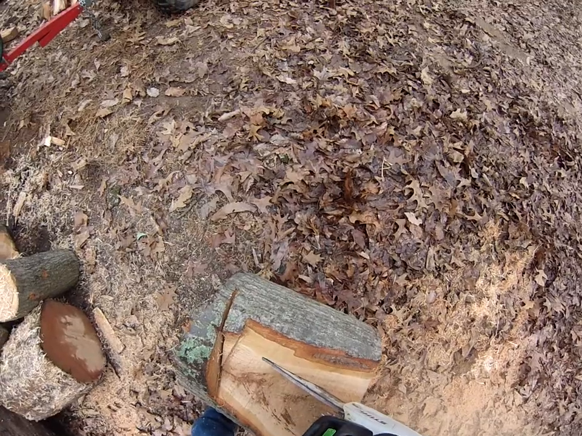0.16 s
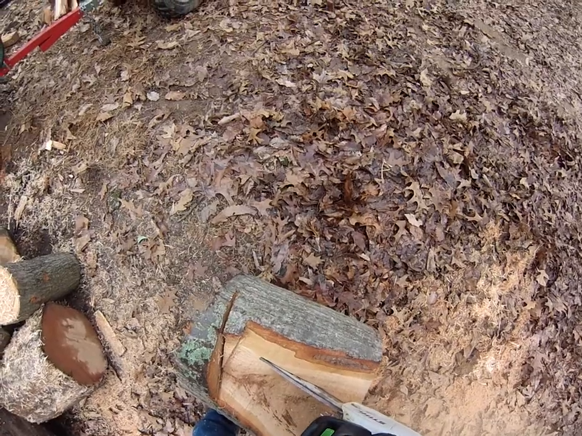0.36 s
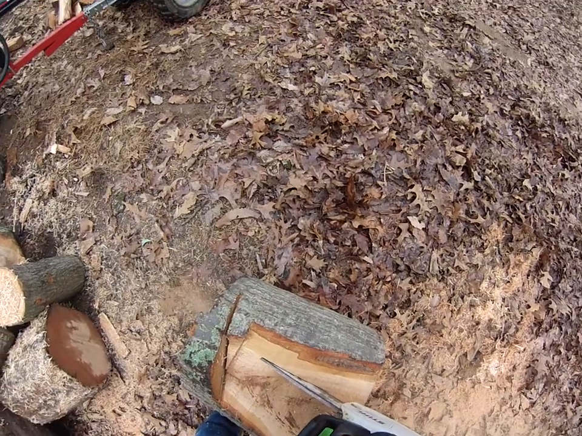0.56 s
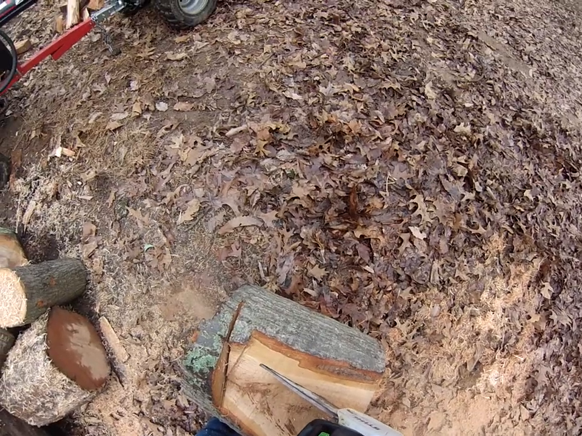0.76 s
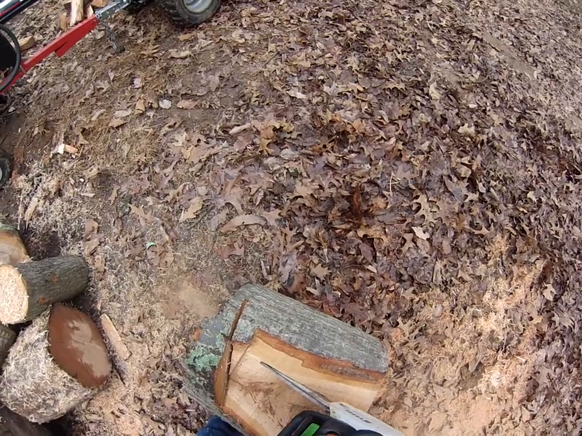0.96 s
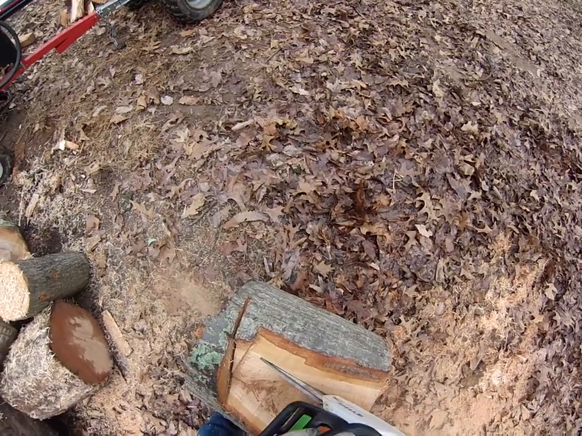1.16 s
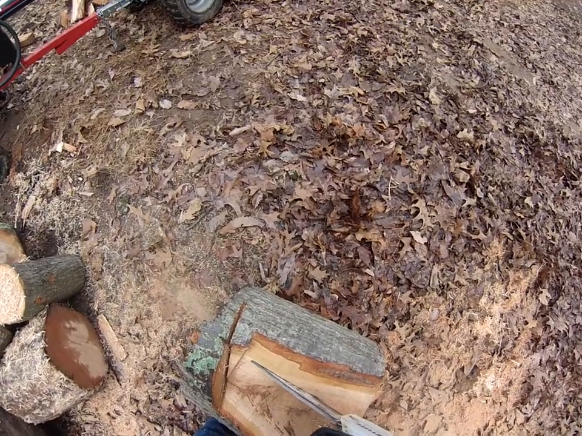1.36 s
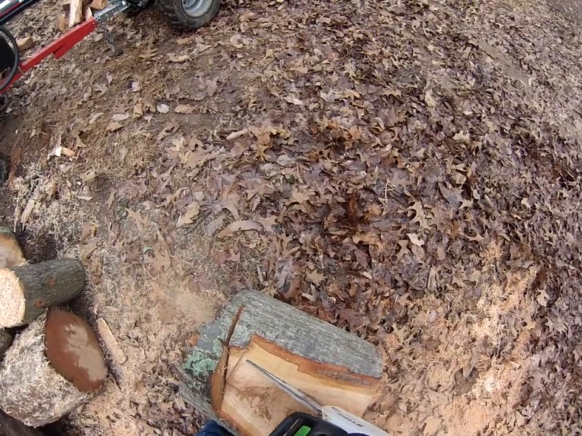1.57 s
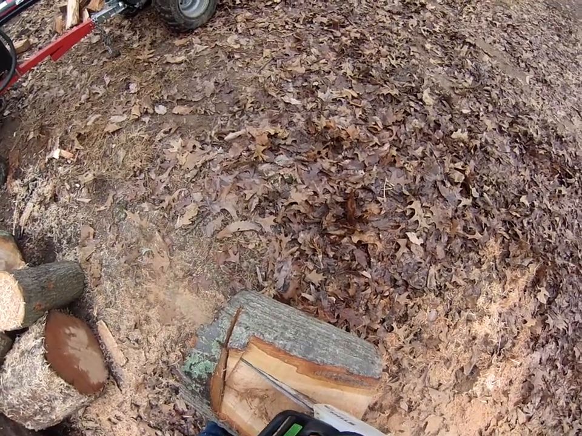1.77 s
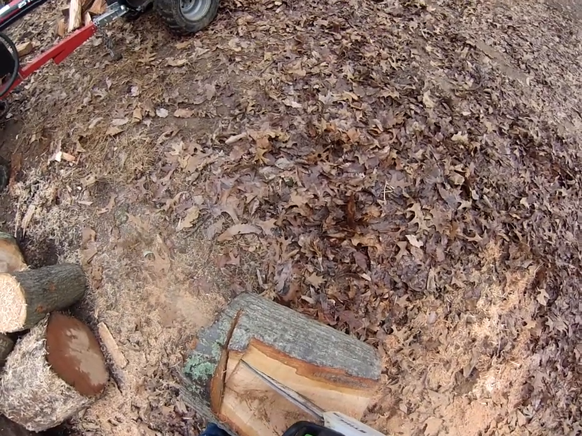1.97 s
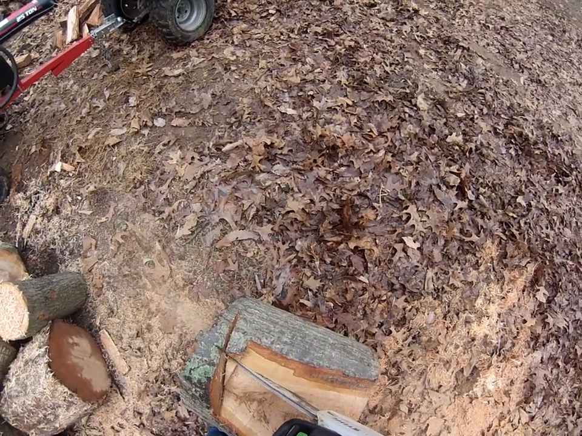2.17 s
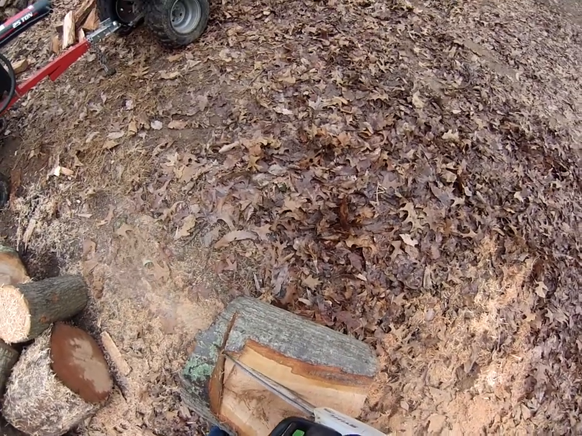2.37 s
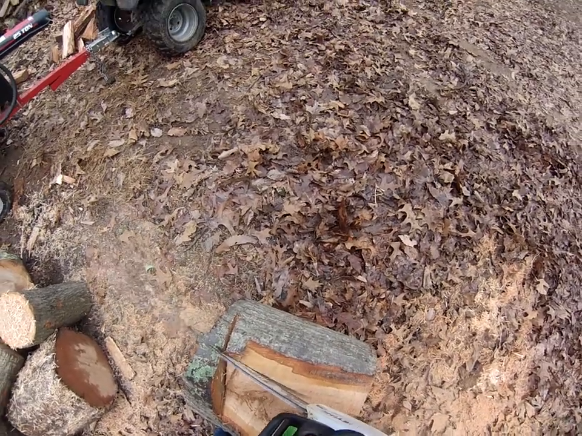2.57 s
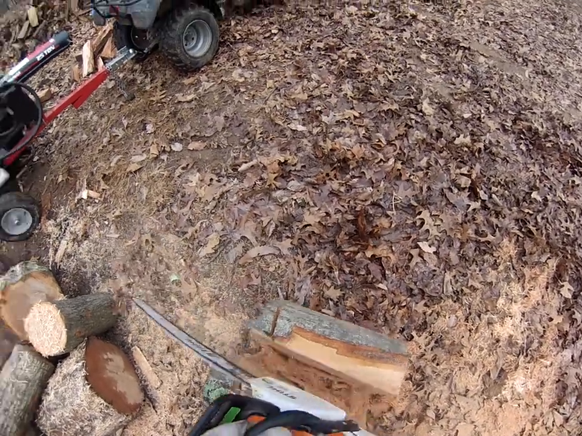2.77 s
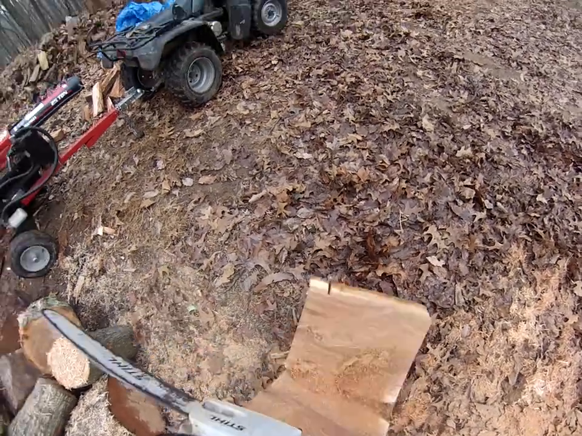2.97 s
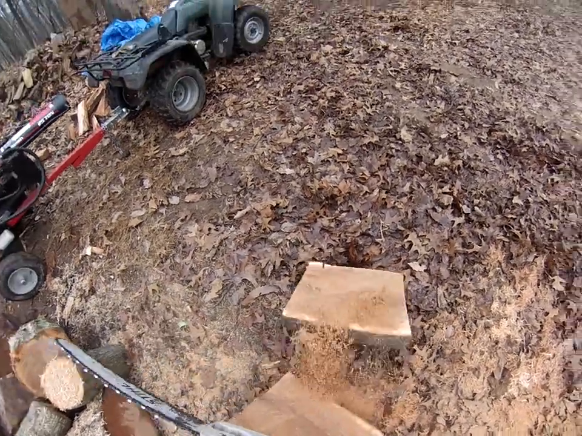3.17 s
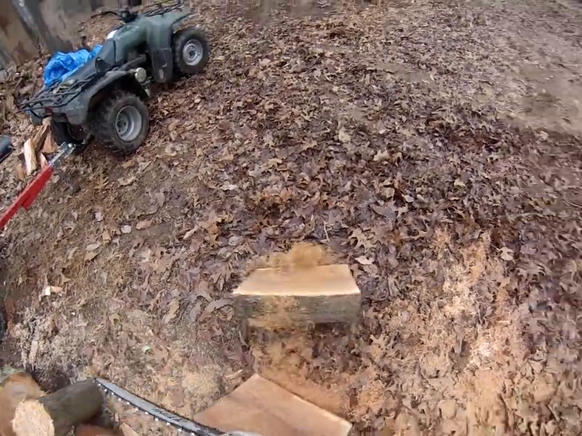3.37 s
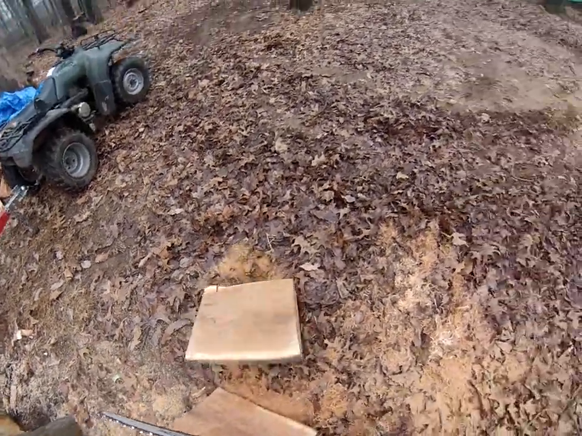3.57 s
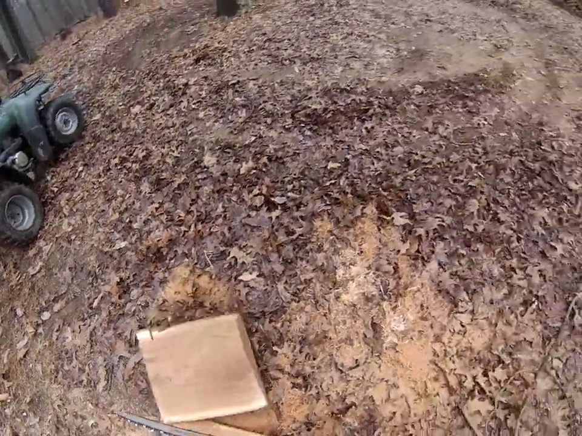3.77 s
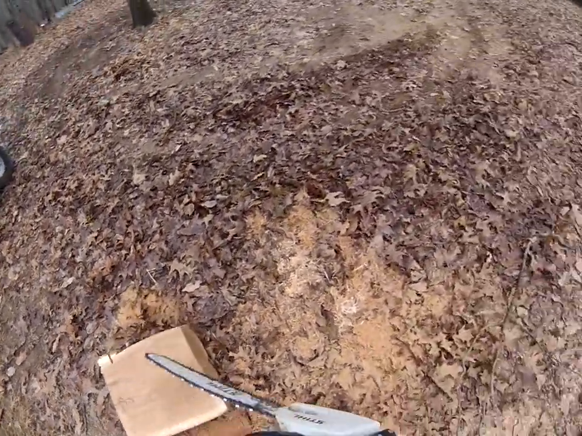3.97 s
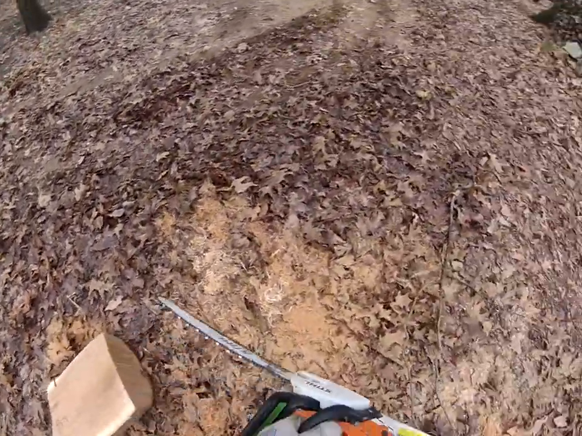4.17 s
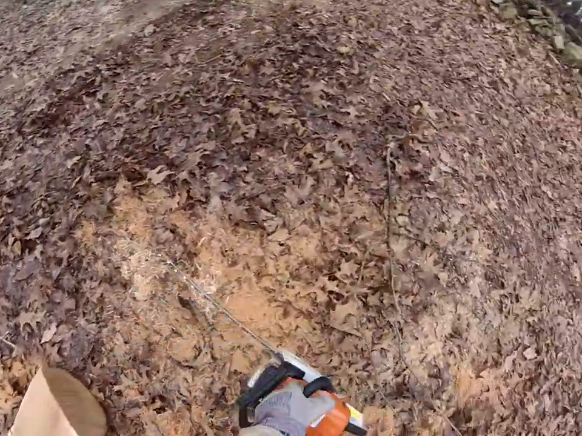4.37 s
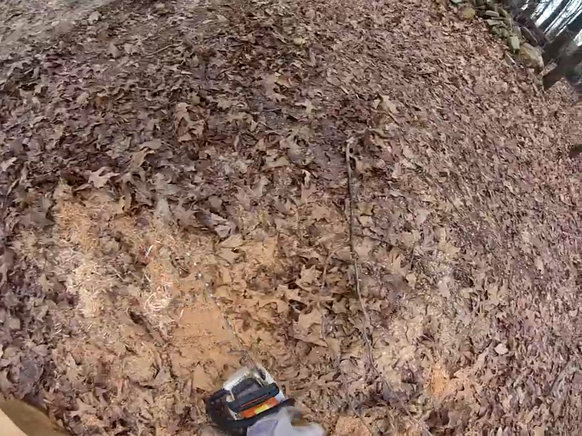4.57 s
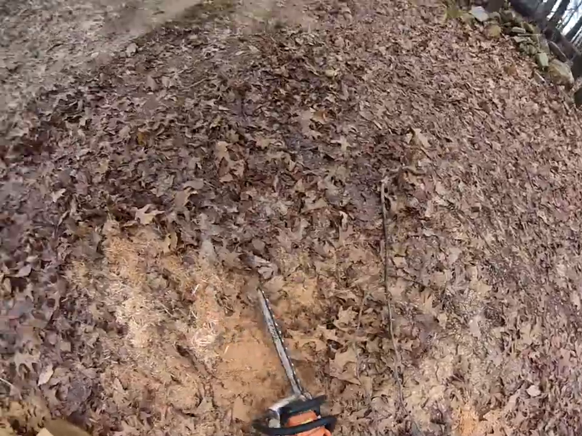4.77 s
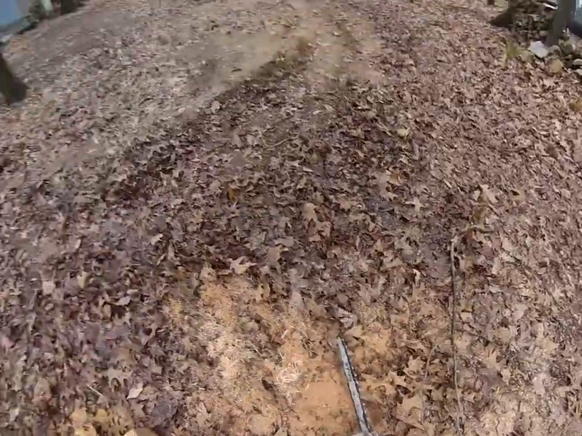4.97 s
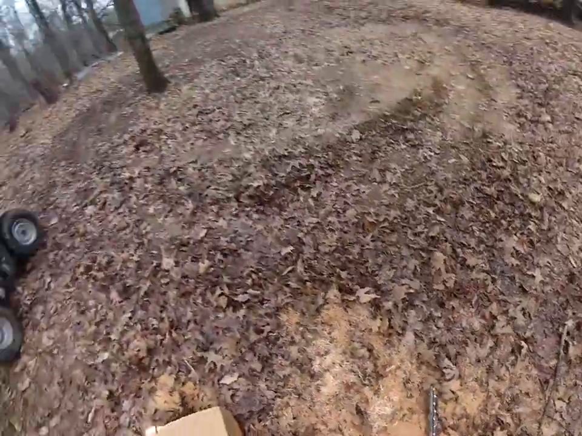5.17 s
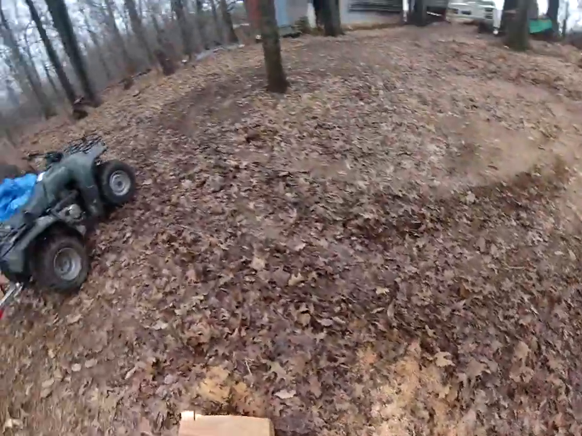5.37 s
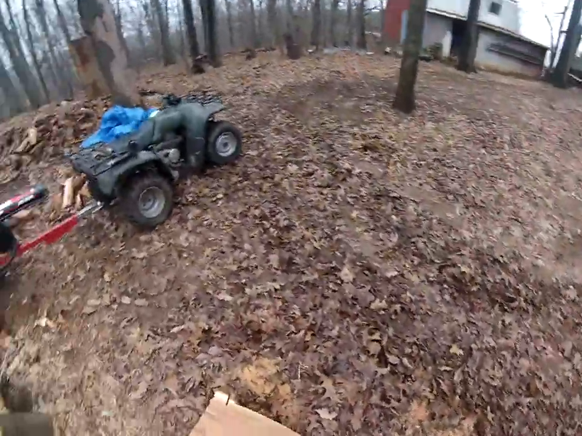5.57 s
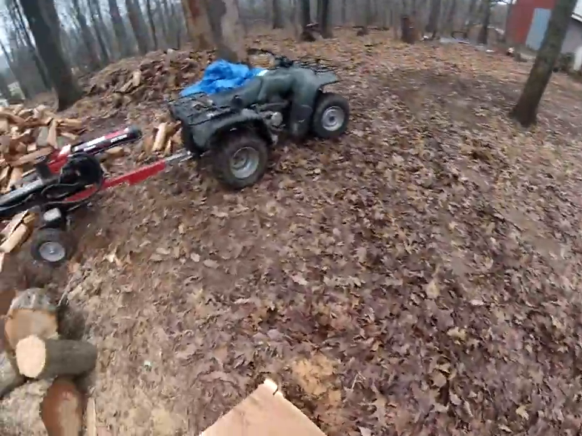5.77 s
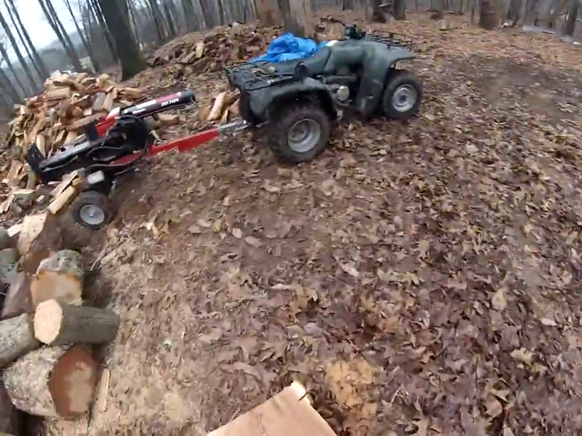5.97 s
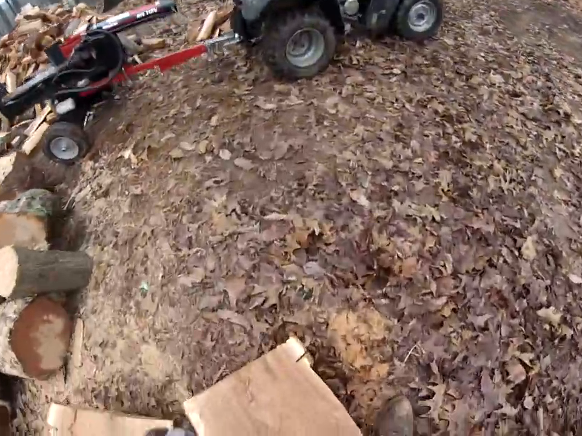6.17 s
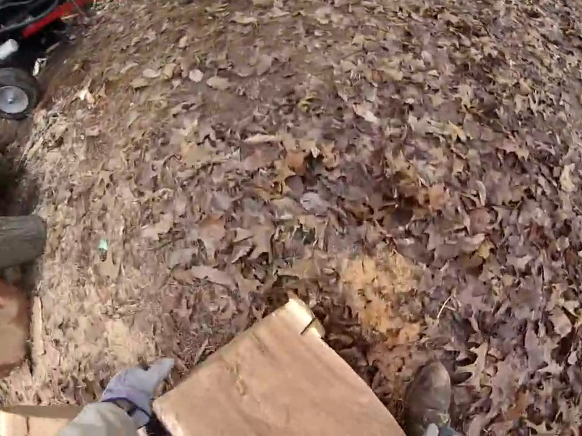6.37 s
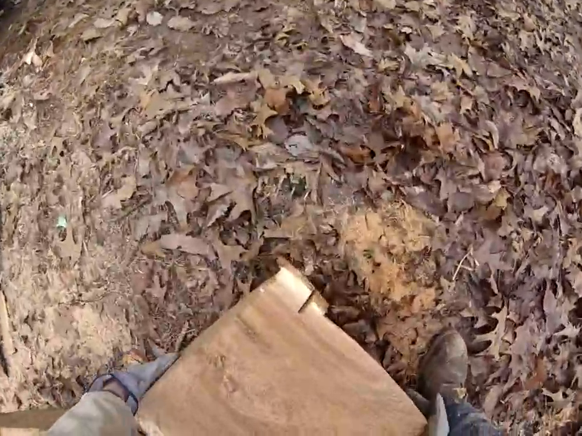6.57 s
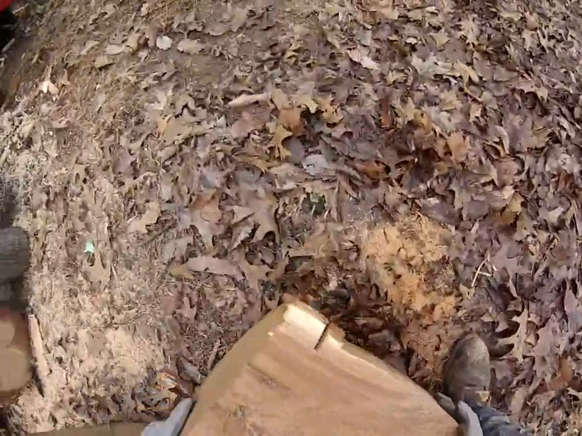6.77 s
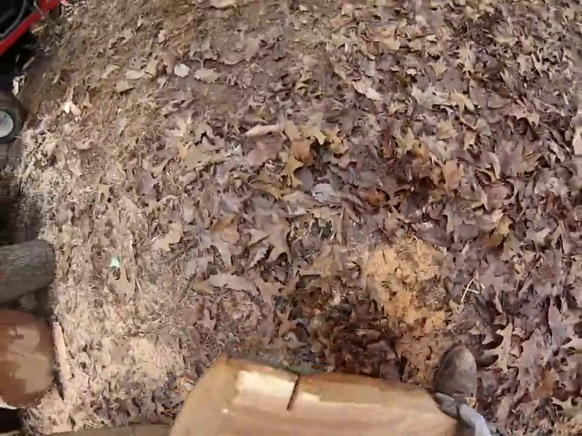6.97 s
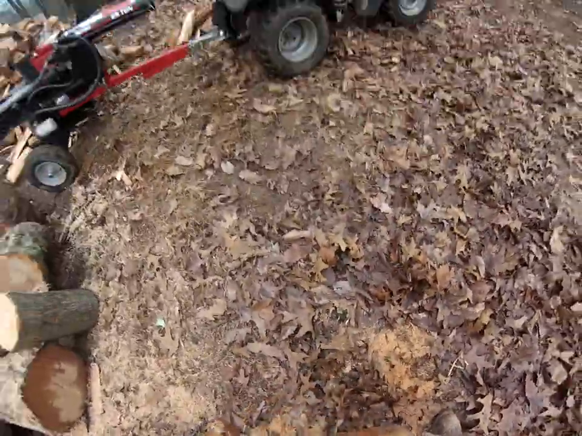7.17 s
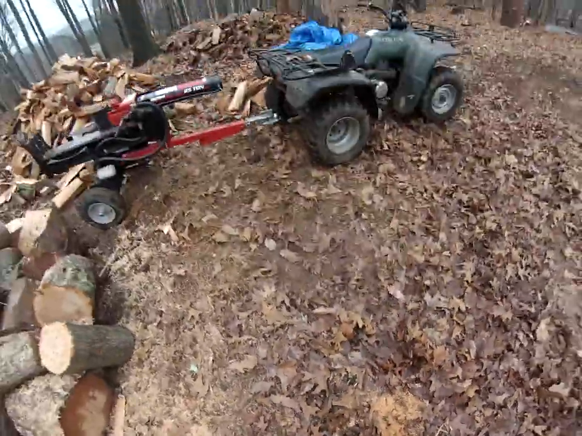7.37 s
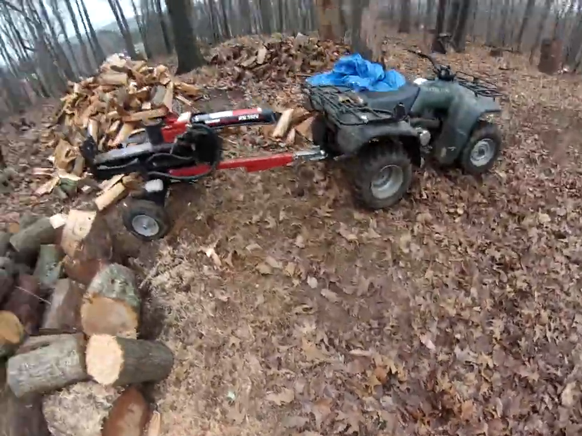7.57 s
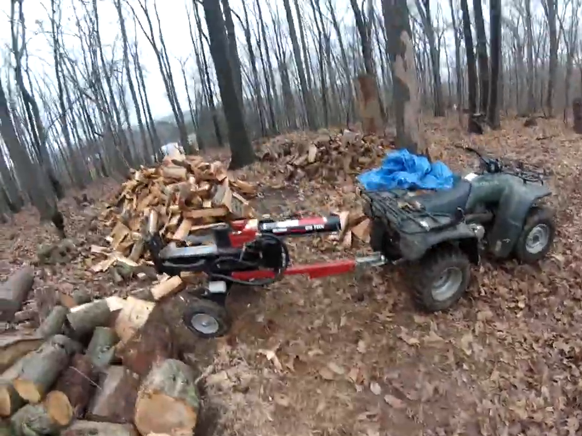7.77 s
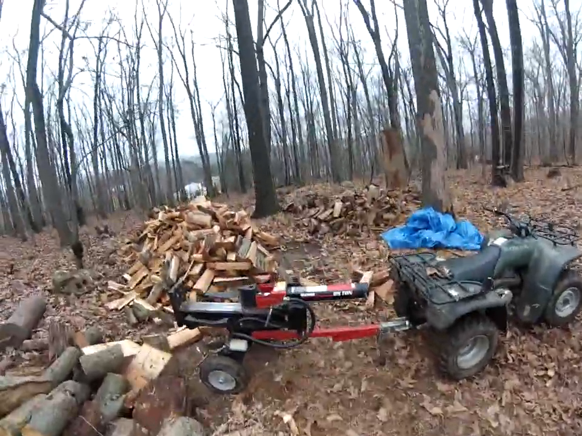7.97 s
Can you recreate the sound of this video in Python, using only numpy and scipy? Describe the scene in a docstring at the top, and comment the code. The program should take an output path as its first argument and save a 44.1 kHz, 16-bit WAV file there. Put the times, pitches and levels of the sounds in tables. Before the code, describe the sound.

A close chainsaw finishes a cut and sputters to a stop, then wind rumbles, another engine idles quietly and wood knocks.

```python
"""Chainsaw cutting a log

A two-stroke chainsaw labours through a log, breaks free with its bar ringing, drops to idle and is switched
off. Its firings blur into a buzz when fast and become separate pops when slow. A four-stroke engine idles
nearby. Air buffets the microphone the sawyer wears, a sleeve swishes, wood and chain snap, small things tick,
and the sawn-off slab knocks as it is picked up."""
import sys
import numpy as np
from scipy import signal
from scipy.fft import irfft
from scipy.io import wavfile
from scipy.ndimage import uniform_filter1d

SR = 44100
rng = np.random.default_rng(int(sys.argv[2]) if len(sys.argv) > 2 else 0)


def transcribe(signal):
    """Save signal, clipped to [-1, 1], as a 16-bit WAV file at the path in sys.argv[1]."""
    frames = np.atleast_2d(signal).T
    limited = np.clip(frames, -1, 1)
    pcm = np.round(limited * 32767).astype(np.int16)
    wavfile.write(sys.argv[1], SR, pcm)


N = 354123
TIME = np.arange(N) / SR
FREQS = np.fft.rfftfreq(8192, 1 / SR)

# Tone curves. Each row: frequency in Hz, relative level in dB.
AIR_TONE = [(6, -23), (14, 12.5), (24, 1.5), (32, -3), (42, -6.5), (60, -25.5), (80, -40), (140, -67)]  # rumble of air on the microphone
MOTOR_EXHAUST_TONE = [(50, -22), (85, -14.5), (110, -7), (137, -0.5), (165, -12), (220, -14.5), (400, -37),
                      (1000, -69)]  # the four-stroke's soft beats
MOTOR_CASING_TONE = [(150, -25), (220, -1.5), (270, -4.5), (350, 1), (440, -9.5), (550, -3), (700, -3.5),
                     (1000, -29.5), (2000, -49)]  # the hum of its casing
MOTOR_CLATTER_TONE = [(350, -48), (600, -7), (702, -38), (786, -8), (932, -8), (1120, -4.5), (1210, 3.5),
                      (1560, 1.5), (1750, -2.5), (2030, -9), (2430, -6.5), (2700, -59), (3510, -56),
                      (5940, -120)]  # its valve clatter
MOTOR_HISS_TONE = [(1470, -28.5), (2500, -3.5), (2760, -9.5), (2970, -9.5), (3530, -2.5), (4190, -14.5),
                   (4800, -10.5), (5130, -13), (5880, -13.5), (6480, -14.5), (9490, -21), (15000, -28)]  # its hiss
SAW_RATTLE_TONE = [(530, -41), (900, -3), (1040, -21), (1360, -4), (1640, 5), (1820, -6), (2200, 3),
                   (3030, -6), (3440, -7.5), (5260, -1), (5990, -20), (6500, -11), (7230, -23), (8230, -20),
                   (15000, -48)]  # the saw shaking at idle
CHAIN_IN_WOOD_TONE = [(590, -45), (1000, -14.5), (1150, -8), (1590, 1.5), (1860, -7), (2110, -2.5),
                      (2620, 0), (2970, -8), (3520, -1.5), (3940, -31.5), (5170, -3.5), (5730, -13.5),
                      (6410, -7.5), (7350, -22), (15000, -45)]  # the chain tearing wood
CHAIN_FREE_TONE = [(530, -33), (900, -20.5), (1170, -19), (1440, -4.5), (1820, -15), (2150, -4.5),
                   (2310, -10.5), (2600, -4.5), (2890, -14.5), (5140, -16), (5920, -22.5), (6350, -18),
                   (9820, -59), (15000, -47)]  # the chain running free
OPEN_EXHAUST_TONE = [(150, -3), (210, 4.5), (330, 7), (430, 4.5), (520, 2.5), (640, 7), (860, 5.5),
                     (1100, -17), (1400, 4)]  # the saw's exhaust, clear of the log

# Modes, the pitches at which a thing rings. Each row: pitch in Hz, width in Hz, relative level in dB.
SLAB_MODES = [(278, 96, 6.5), (474, 110, -4), (950, 300, -11), (1500, 180, 0), (2140, 430, 0),
              (4000, 3600, -30)]  # the sawn-off wood
COVER_MODES = [(1335, 210, 0), (2184, 40, 7.5), (2597, 144, 2), (3500, 470, -6), (5200, 600, -9.5),
               (6490, 250, -9), (8340, 1900, -20)]  # the saw's clutch and cover
POP_MODES = [(150, 67, -4), (240, 34, 1.5), (340, 116, -5.5), (405, 85, 1), (490, 60, -5), (629, 60, 1),
             (730, 100, -5), (1320, 500, -16)]  # its muffler at idle
MUFFLER_MODES = [(184.6, 51, 11), (308.6, 89, 9.5), (463, 65, -2.5), (700, 94, 9), (881, 165, 8)]  # its muffler while cutting
HOUSING_MODES = [(1381, 146, 0), (1619, 156, 0.5), (2160, 121, 5.5), (2526, 186, -1), (2670, 150, 1),
                 (3153, 137, -3), (3547, 430, 2), (3810, 120, 0), (4336, 270, 2), (5010, 560, -3),
                 (6410, 480, -13.5), (9000, 5000, -33.5)]  # its exhaust port and housing

# Gusts as the sawyer moves. Each row: middle in seconds, level in dB, half length in seconds.
AIR_GUSTS = [(0.12, -32, 0.07), (0.38, -28, .09), (1.001, -33, 0.47), (3.147, -29, .05),
             (5.546, -24.5, 0.091), (6.006, -23.5, 0.065), (6.417, -29, 0.23), (6.79, -26, .13),
             (7.296, -18.5, 0.12), (7.724, -23, 0.16)]
# Jolts of the microphone. Each row: start in seconds, level in dB, fade time in seconds.
MIC_JOLTS = [(5.462, -34.5, 0.025), (5.583, -41, 0.032), (5.96, -52, 0.05), (6.49, -44, 0.072),
             (7.222, -33, .035), (7.672, -42, 0.13)]
# Ticks and snaps: a sharp snap of wood or chain as the saw is shut, a chain slap as it stops, and small ticks.
# Each row: start in seconds, peak in dB, pitch in Hz, width in Hz, fade time in seconds.
TICKS_AND_SNAPS = [(3.036, -11, 1300, 600, .005), (4.03, -25, 3200, 2200, .004),
                   (4.647, -49, 11500, 5000, .005), (4.686, -47, 9500, 9000, .007),
                   (4.703, -46, 10000, 9000, .006), (4.793, -46, 5100, 900, .004),
                   (5.398, -48, 9700, 2000, .002), (5.504, -32, 9600, 1500, .002),
                   (5.574, -40, 10800, 1800, .002), (6.1, -34, 8800, 1700, .002)]
# Knocks on the slab. Each row: start in seconds, relative strength in dB.
SLAB_KNOCKS = [(4.702, -33.5), (7.196, -22.5), (7.241, -31), (7.291, -29), (7.315, -26), (7.322, -36),
               (7.383, -28), (7.397, -30)]
# The four-stroke as the sawyer turns and walks.
# Each row: time in seconds, level in dB, how squarely he faces it from 0 to 1.
MOTOR_VIEW = [(4.3, -50.5, 0.25), (4.9, -51, 0.04), (5.5, -46, 0.1), (6.05, -45.5, 1), (6.6, -43.5, 0.25),
              (6.95, -43.5, 0.5), (7.4, -44, 1), (7.8, -46, 0.9), (8.03, -45.5, 0.8)]
# Its gear whines. Each row: cycles per engine turn (rounded when used), relative level in dB,
# dB added when facing it.
GEAR_WHINES = [(20, -19.5, 1), (22, -12.5, -12), (28, -26, 16), (44, -1.5, -9), (48, -2, -6.5),
               (61, -14, -16), (65.6, -10.5, -4), (89.5, -23.5, 11)]
# The saw's speed with the throttle open. Each row: time in seconds, firings per second.
SAW_SPEED = [(0.0, 162.2), (0.09, 160), (0.21, 149.9), (0.32, 142.3), (0.45, 135.7), (0.58, 141),
             (0.87, 157.2), (1.05, 167.1), (1.22, 172.5), (1.3, 172.5), (1.55, 190), (1.61, 187.9),
             (1.9, 170.0), (2.07, 182.4), (2.55, 175.8), (2.6, 179.1), (2.65, 188.1), (2.72, 207.9),
             (2.78, 216.7), (2.95, 178.5), (3.01, 173.6), (3.05, 162.1)]

# The saw breaks through, the throttle shuts, the ignition goes off, the strokes end.
BREAK_S, SHUT_S, OFF_S, STOP_S = 2.68, 3.042, 3.863, 4.42


def amp(db):
    """Turns decibels into a gain."""
    return 10 ** (np.asarray(db) / 20)


def unit(x):
    """Scales a sound to an average (rms) level of 1."""
    return x / np.sqrt(np.mean(abs(x) ** 2) + 1e-20)


def steady(x, size=4001):
    """Holds the level near 1, averaged over size samples."""
    return x / np.sqrt(abs(uniform_filter1d(x ** 2, size)) + 1e-9)


def curves(rows):
    """Joins each column of a table with straight lines in time."""
    times, *columns = np.transpose(rows)
    return [np.interp(TIME, times, column) for column in columns]


def between(start, end, fade):
    """Fades in from start and out by end, all in seconds."""
    return np.clip((TIME - start) / fade, 0, 1) * np.clip((end - TIME) / fade, 0, 1)


def swell(at, half_length):
    """A smooth bump of height 1."""
    return np.exp(-((TIME - at) / half_length) ** 2)


def noise():
    """White noise at level 1."""
    return rng.standard_normal(N)


def drift(per_s):
    """A random wander of about 1 either way."""
    return 1.2 * np.interp(TIME * per_s, np.arange(4000), rng.standard_normal(4000))


def clicks(times, sizes):
    """Single clicks at the given moments."""
    return np.bincount(np.round(np.asarray(times) * SR).astype(int), sizes, N)[:N]


def fade_out(x, seconds):
    """Gives each click a fading tail."""
    return signal.lfilter([1], [1, -np.exp(-1 / (seconds * SR))], x + 1e-18)


def tone(points):
    """The gain at each frequency, from a tone curve."""
    hz, db = np.transpose(points)
    return amp(np.interp(np.log(FREQS + 1), np.log(hz), db))


def peaks(modes):
    """The gain at each frequency, from a list of modes."""
    gains = [amp(db) / (1 + ((FREQS - hz) / (0.64 * width)) ** 2) for hz, width, db in modes]
    return np.sqrt(sum(gain ** 2 for gain in gains))


def body_response(gain):
    """Adds the delays (phases) that make a body ring only after it is struck."""
    log_gain = np.log(np.maximum(gain / gain.max(), 1e-5))
    mirrored = np.r_[log_gain, log_gain[-2:0:-1]]
    return np.exp(np.conj(signal.hilbert(mirrored)))[:len(FREQS)]


def colour(x, gain):
    """Passes a sound through a ringing body; white noise keeps its level."""
    ring = irfft(body_response(gain))
    return signal.oaconvolve(x, ring / np.linalg.norm(ring))[:len(x)]


def echoes(x, seconds, per_s):
    """Short echoes off ground and woodpile that change as the microphone moves."""
    tails = rng.standard_normal((3, 4096)) * np.exp(-TIME[:4096] / seconds)
    shares = [np.cos(np.pi * (per_s * TIME + k / len(tails))) for k in range(len(tails))]
    return unit(sum(share * signal.oaconvolve(x, tail)[:N] for share, tail in zip(shares, tails)))


def harmonics(turns, hz, gain, scatter, count):
    """Multiples of the firing rate glide through a body's tone; shifting echoes make each waver."""
    size = int(3.2 * SR)  # long enough for the cut
    response, turn = body_response(gain), np.exp(2j * np.pi * turns[:size])
    out, wave, coarse_hz = np.zeros(size), np.ones(size, complex), hz[:size:32]
    for k in range(1, count + 1):
        wave = wave * turn
        echo = signal.resample(rng.standard_normal(16) + 1j * rng.standard_normal(16), len(coarse_hz))
        weight = np.interp(k * coarse_hz, FREQS, response) * (1 + scatter * echo)
        out += (np.interp(np.arange(size), np.arange(0, size, 32), weight) * wave).real
    return np.pad(out, (0, N - size))


def buffeting():
    """Air rumbles on the microphone, with gusts and dull jolts as the sawyer moves."""
    resting = amp(-39 + 2 * drift(per_s=9))
    gusts = sum(amp(db) * swell(at, half_length) for at, db, half_length in AIR_GUSTS)
    jolts = sum(amp(db) * fade_out(clicks([at], [1.]), fade) for at, db, fade in MIC_JOLTS)
    thud_tone = tone([(15, 0), (45, 0), (80, 1), (150, -14), (350, -24.5), (1000, -58)])
    thuds = colour(noise() * jolts, thud_tone)
    rumble = steady(colour(noise(), tone(AIR_TONE)), size=9001)
    return np.hypot(resting, gusts) * rumble + thuds


def sleeve():
    """A sleeve brushes the jacket in one soft, high swish."""
    return amp(-64) * swell(at=5.8, half_length=0.19) * colour(noise(), peaks([(7200, 600, 0)]))


def ticks():
    """Tiny bursts of noise, each ringing around one bright pitch."""
    out = np.zeros(N)
    for start, db, hz, width, fade in TICKS_AND_SNAPS:
        burst = rng.standard_normal(4096) * np.exp(-TIME[:4096] / fade)
        tick = colour(burst, peaks([(hz, width, 0)]))
        out[int(start * SR):][:len(tick)] += amp(db) * tick / abs(tick).max()
    return out


def slab():
    """Each blow, a click with a noisy tail, makes the wood ring dully."""
    times, db = np.transpose(SLAB_KNOCKS)
    blows = clicks(times, amp(db))
    return colour(3 * blows + 0.22 * fade_out(blows, 0.011) * noise(), peaks(SLAB_MODES))


def motor(turns_per_s=27.35):
    """A four-stroke idles: exhaust beats, valves clatter, gears whine, all shifting as the sawyer turns."""
    level_db, facing = curves(MOTOR_VIEW)
    turns = np.cumsum(turns_per_s * (1 + .0036 * drift(7))) / SR
    times = TIME[1:][np.diff(np.floor(turns)) > 0]
    beats = clicks(times, 1 + 0.05 * rng.standard_normal(len(times)))
    valves = unit(3 + np.exp(-(2 * turns % 1) / .25)) * amp(2 * drift(160))
    metal = steady(echoes(beats, seconds=0.03, per_s=0.692), size=601)  # echoes fill the gaps
    exhaust = amp(-6.5) * colour(unit(beats) + 0.55 * noise(), tone(MOTOR_EXHAUST_TONE))
    casing = amp(-14.5) * colour(1.08 * metal + .5 * noise(), tone(MOTOR_CASING_TONE))
    whine = np.zeros(N)
    for cycles, db, facing_db in GEAR_WHINES:
        level = amp(db + facing_db * facing + 2 * drift(6))
        whine += level * np.sqrt(2) * np.sin(2 * np.pi * (round(cycles) * turns + rng.random()))
    clatter = amp(-0.5) * colour(0.92 * metal + 0.87 * noise() * valves, tone(MOTOR_CLATTER_TONE))
    rush = 0.71 * echoes(noise(), seconds=0.00076, per_s=0.483)
    hiss = amp(-4.5) * colour(rush + 0.5 * noise() * valves + 0.41 * metal, tone(MOTOR_HISS_TONE))
    return amp(level_db) * (exhaust + casing + whine + clatter + hiss)


def saw_idling(idle_hz=54.57, extra_hz=40, settle_s=.067, coast_s=.358):
    """Each stroke pops in the muffler and shakes chain and cover; switched off, they slow and weaken."""
    settling = np.exp(-np.maximum(TIME - SHUT_S, 0) / settle_s)
    coasting = np.exp(-np.maximum(TIME - OFF_S, 0) / coast_s)
    hz = (idle_hz + extra_hz * settling) * coasting * (1 + 0.0091 * drift(9))
    turns = np.cumsum(hz) / SR
    turns -= np.interp(3.867, TIME, turns)  # one stroke falls just after switch-off
    times = TIME[1:][np.diff(np.floor(turns)) > 0]
    times = times[(times > SHUT_S) & (times < STOP_S)]
    octaves = np.log2(coasting)
    shake_db = -28.5 + 13 * octaves
    pop_db = 9 * np.interp(times, TIME, octaves)
    uneven = rng.standard_normal((len(times), 3))  # a two-stroke never burns the same charge twice
    uneven[times > OFF_S] = 0  # unfired strokes only pump air, so they are even
    timing_jitter, pop_jitter, shake_jitter = uneven.T

    strokes = clicks(times, amp(np.interp(times, TIME, shake_db) + 1.4 * shake_jitter))
    shake = 1.63 * uniform_filter1d(fade_out(strokes, 0.0055), 90)
    shake += 0.54 * amp(shake_db) * between(3.02, 4.7, 0.13)  # shaking goes on between strokes
    grit = noise() * amp(1.5 * drift(520)) * shake
    rattle = amp(-6.5) * colour(grit, tone(SAW_RATTLE_TONE))
    cover = amp(-6.5) * colour(noise() * shake, peaks(COVER_MODES))

    gas = clicks(times + .00017 * timing_jitter, amp(pop_db + 2 * pop_jitter))
    dull = between(3.79, 9, 0.18)  # slow strokes ring only the muffler's low notes
    pops = amp(-15) * colour(gas * (1 - dull), peaks(POP_MODES))
    dull_pops = amp(-10.5) * colour(gas * dull, peaks([(247, 110, 3), (390, 270, -6)]))
    puff = amp(-25) * colour(noise() * shake, tone([(80, -20), (250, -3), (900, 0), (2000, -20)]))
    return rattle + cover + pops + dull_pops + puff


def saw_exhaust(turns, hz, blast, free):
    """Firings drone through the muffler with a rush of gas; the tone opens up once clear of the log."""
    in_log = harmonics(turns, hz, peaks(MUFFLER_MODES), scatter=0.29, count=8)
    clear = harmonics(turns, hz, tone(OPEN_EXHAUST_TONE), scatter=0.26, count=8)
    gas_tone = tone([(100, -8), (250, -6), (500, 6.5), (900, 10), (1300, 7), (2500, -4)])
    return steady((1 - free) * in_log + free * clear) + amp(-8.5) * colour(noise() * blast, gas_tone)


def saw_rasp(turns, hz, blast, free, bog_hz=159):
    """Firings ring the housing while the chain tears wood, then runs free."""
    bogged = np.clip((bog_hz - hz) / 11.7, 0, 1)  # 1 when the cut drags the engine right down
    noisy_share = (1 - free) * (0.26 + 0.21 * bogged) + free * 0.68
    firings = steady(harmonics(turns, hz, peaks(HOUSING_MODES), scatter=0.91, count=72))
    firings *= 1 + 0.14 * drift(170)
    wood = colour(noise() * blast, tone(CHAIN_IN_WOOD_TONE))
    housing = colour(noise() * blast, peaks(HOUSING_MODES))
    tearing = np.sqrt(1 - free) * unit(wood + 0.73 * housing)
    flutter = noise() * blast * (1 + 0.074 * drift(220))
    chain = amp(1) * np.sqrt(free) * colour(flutter, tone(CHAIN_FREE_TONE))
    rasp = np.sqrt(1 - noisy_share) * firings + np.sqrt(noisy_share) * (tearing + chain)
    return amp(-16 - 2.5 * bogged - 1.5 * free) * rasp


def chip_spray():
    """Flying chips hiss, growing louder as the cut deepens."""
    chips = noise() * amp(1.6 * drift(400))
    chip_tone = tone([(4000, -37), (7000, 1.5), (9500, 2.5), (11000, -5.5), (12000, -1),
                      (13000, -15), (14000, -8), (15300, -27)])
    return amp(-38.5 + 1.75 * TIME) * colour(chips, chip_tone)


def saw_cutting(cruise_hz=175, bar_hz=2142, shut_db_per_s=-370):
    """Exhaust, rasp and chips roar until the throttle shuts; the bar rings once it is free."""
    hz, = curves(SAW_SPEED)
    free = np.clip((TIME - BREAK_S) / 0.074, 0, 1)  # 0 in the log, 1 clear of it
    turns = np.cumsum(hz * (1 + 0.00398 * drift(18))) / SR  # the chain grabs and slips
    turns += .002 * drift(170)
    blast = unit(0.67 + np.exp(-(turns % 1) / 0.65))  # gas escapes once a turn
    blast *= 1 + 0.033 * drift(130)
    surge = swell(at=2.735, half_length=0.039)  # as the bar breaks through
    exhaust_db = -26.5 + 5.5 * np.log2(hz / cruise_hz) - 6 * free + 9 * surge
    exhaust = amp(exhaust_db) * saw_exhaust(turns, hz, blast, free)
    roar = exhaust + saw_rasp(turns, hz, blast, free) + chip_spray()
    throttle = amp(shut_db_per_s * np.maximum(TIME - SHUT_S, 0))
    # the bar sings each time a harmonic sweeps past its pitch
    bar = harmonics(turns, hz, peaks([(bar_hz, 66, 0)]), scatter=0.061, count=15)
    return roar * throttle + amp(-10.5) * free * bar * between(2, 3.03, 0.05)


def scene():
    """All sources in the open air, in one channel."""
    return (saw_cutting() + saw_idling() + motor() + buffeting() + ticks() + slab() + sleeve())[None]


def record(dry):
    """Rounds off the tallest peaks, then cuts the treble above 15300 Hz."""
    rounded = dry / (1 + (dry / .85) ** 6) ** (1 / 6)
    lowpass = signal.firwin(511, 15300, window=("kaiser", 9), fs=SR)
    return signal.oaconvolve(rounded, lowpass[None], "same")


dry = scene()
out = record(dry)
transcribe(out)
```